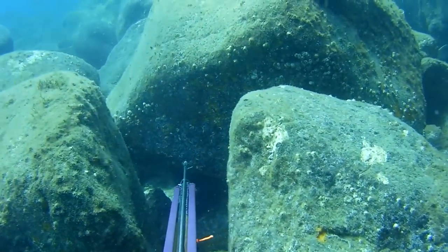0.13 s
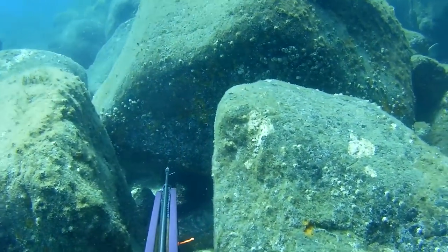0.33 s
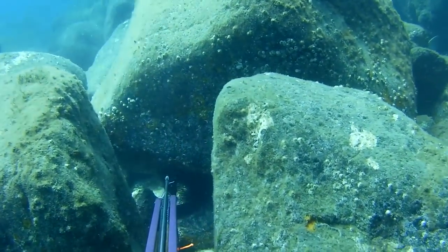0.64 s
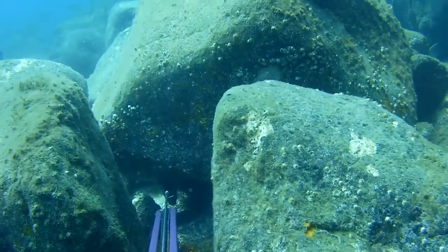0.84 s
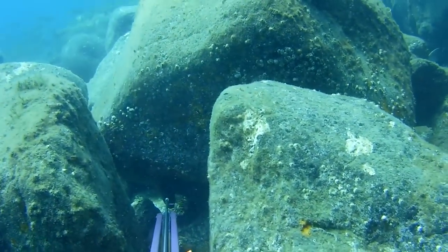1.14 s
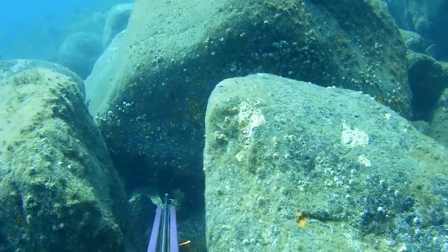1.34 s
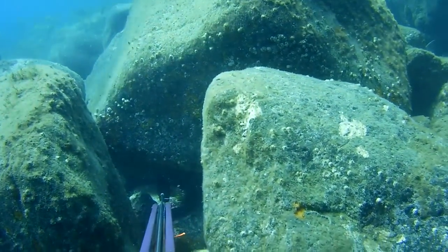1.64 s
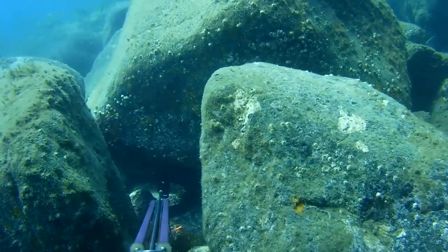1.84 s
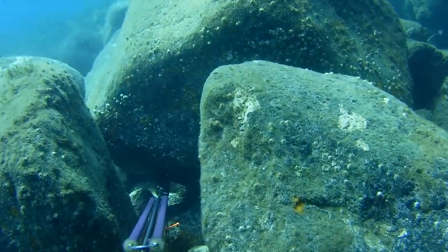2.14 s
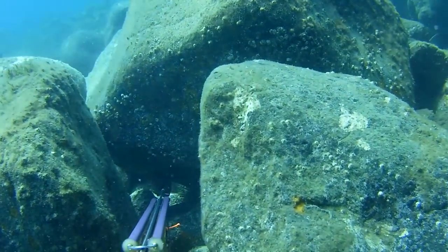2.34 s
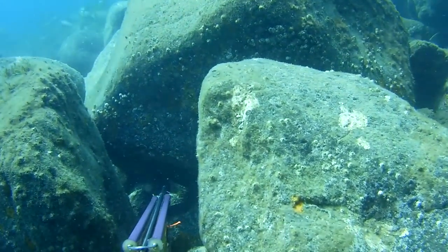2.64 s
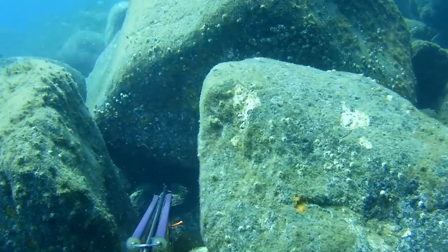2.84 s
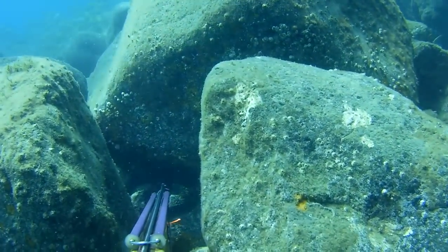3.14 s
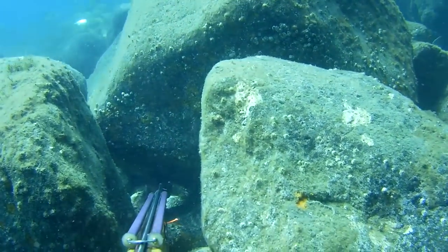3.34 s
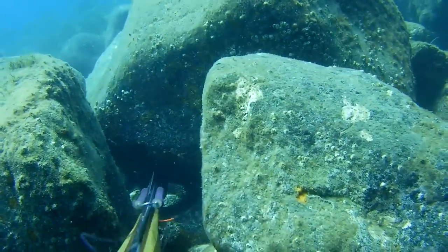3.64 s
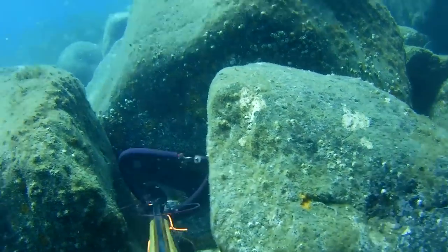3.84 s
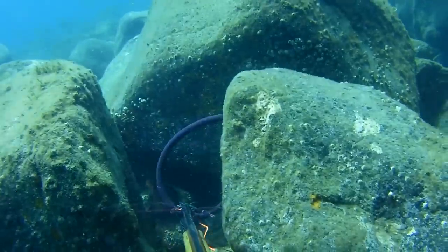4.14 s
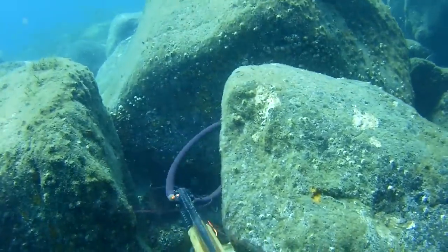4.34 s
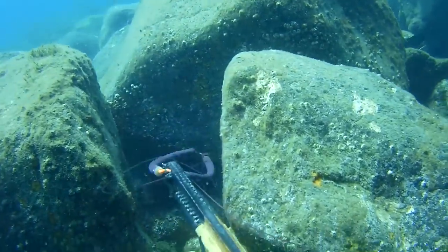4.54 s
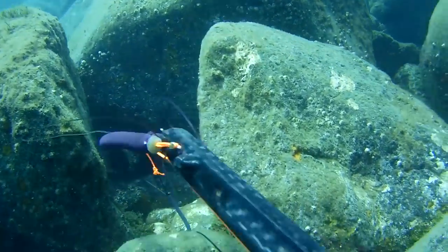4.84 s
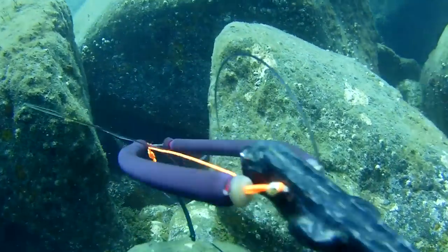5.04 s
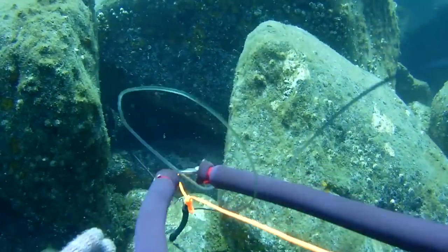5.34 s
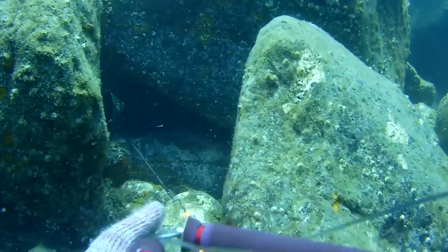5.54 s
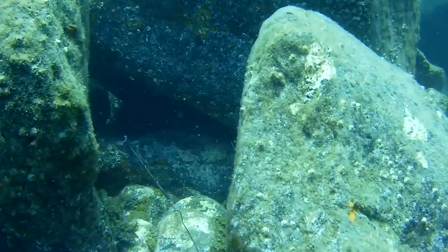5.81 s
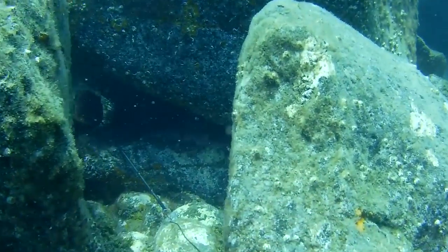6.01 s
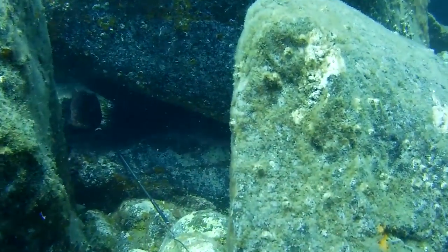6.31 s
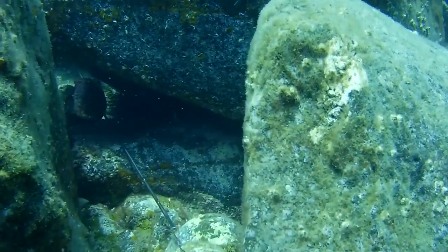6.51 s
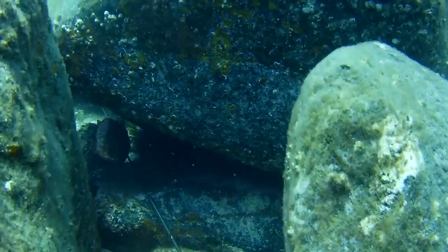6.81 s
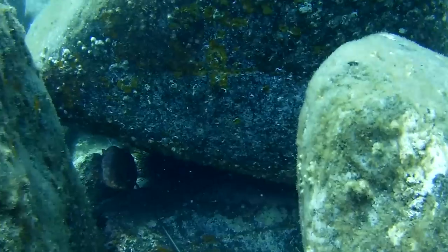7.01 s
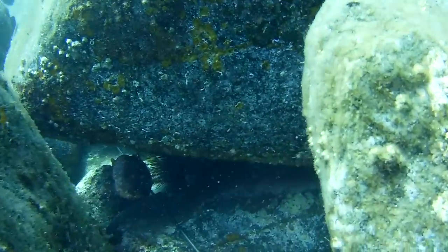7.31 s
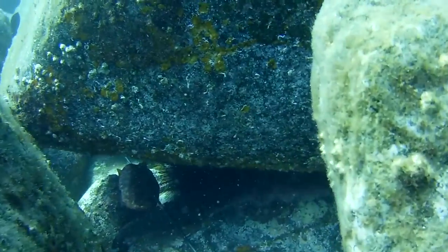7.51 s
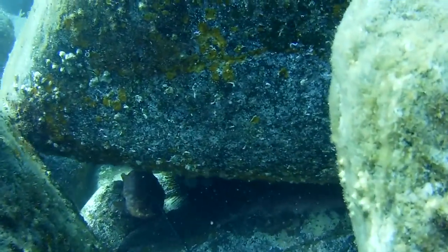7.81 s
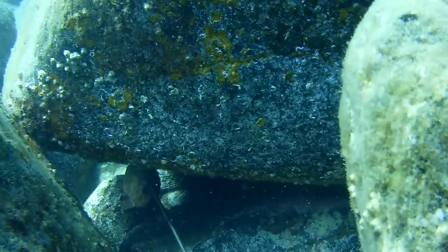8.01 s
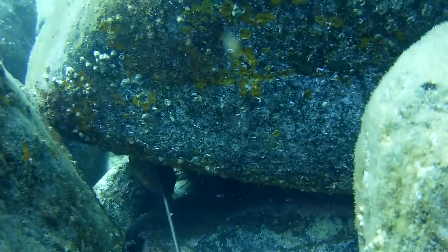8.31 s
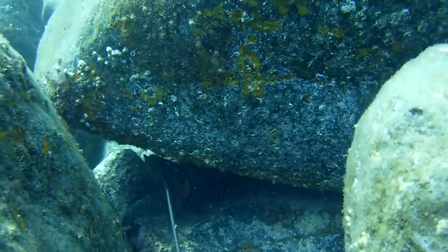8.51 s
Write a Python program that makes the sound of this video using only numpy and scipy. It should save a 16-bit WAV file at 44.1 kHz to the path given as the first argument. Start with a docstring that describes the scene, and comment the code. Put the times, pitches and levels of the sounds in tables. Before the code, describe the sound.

Underwater on a rocky reef, heard in mono from inside a sealed camera housing. Throughout, a flickering low murmur of water lies under a dense, dry crackle of distant shrimp, with irregular nearer snaps, bright and crisp or duller and smeared by the rocks. From 0 to 0.6 s rapid small knocks bump the case, thinning until about 1.1 s. Mostly crackle follows; from 2.15 s come soft, hollow handling knocks. At about 3.7 s the spear gun fires: a very loud clatter of clacks and thuds lasting some 0.2 s, a low shuddering wobble, and a short steel ping at 3.84 s. A deep slosh surges and dies while knocks continue to about 4.5 s. Sparse bumps return, clearest at 5.6 s. The crackle carries on, with strong snaps at 6.4 and 6.7 s, the loudest at 7.87 s, and another at 8.24 s, until the end near 8.6 s.

```python
"""Rocky reef, heard inside a sealed camera housing: water murmurs, with a deep surge after each knock.
Shrimp snaps, far and near, are noise bursts scattered off the rocks that ring the housing.
Gear knocks are short pushes that ring the case. A rubber-powered spear gun goes off with a clatter
of bursts, a shudder of two low resonances and a steel ping of harmonic partials."""
import sys
import numpy as np
from scipy import signal
from scipy.fft import rfft, irfft, next_fast_len
from scipy.io import wavfile
from scipy.ndimage import uniform_filter1d

SR = 44100
rng = np.random.default_rng(int(sys.argv[2]) if len(sys.argv) > 2 else 0)


def transcribe(u):
    """Save the signal u as a 16-bit wav file named by the first command-line argument.

    u: samples, shape (n,) or (channels, n), limited to [-1, 1]; the rate is SR.
    q: integer samples, one column per channel.
    """
    v = np.clip(np.atleast_2d(u).T, -1, 1)
    q = np.round(v * 32767).astype(np.int16)
    wavfile.write(sys.argv[1], SR, q)


N = 381906

# knocks on the case: t/s, louder of thump and ring as peak level/dB,
# hollowness as ring over thump level/dB, hardness as tick over that peak level/dB
CASE_KNOCKS = [(0.047, -24.5, -0.5, -1), (0.102, -26.5, -1.5, -1), (0.144, -25.5, 1, -1.5),
               (0.18, -23, -3.5, -3), (0.23, -22.5, -1, 2), (0.286, -26.5, -8, 2), (0.328, -24.5, -5, 1),
               (0.355, -33.5, 0, 9.5), (0.366, -26, 12, -5), (0.4, -32.5, -1, 0),
               (0.469, -26.5, -2.5, -3.5), (0.516, -37, -5, -6), (0.582, -36.5, -8, -1),
               (0.811, -27.5, -3.5, -5), (0.944, -29, -7, -5), (1.008, -36, -3, -6), (1.124, -30, -10, -4),
               (2.151, -29, 24, -27), (2.299, -26.5, -17, -1.5), (2.678, -37.5, 13, -5),
               (2.744, -29, 26, -23), (2.893, -31.5, -6, -5), (2.941, -38, 9, -14), (2.975, -31, 23, -18),
               (3.125, -27.5, 33, -26), (3.201, -30.5, 6, -19), (3.335, -32, 14, -18),
               (3.547, -28.5, 24, -18), (3.574, -33, -8, -9), (3.627, -30.5, 29, -22), (3.689, -15, 4, -6),
               (3.705, -18, 5, 9), (3.716, -12, 3.5, 8), (3.725, -18.5, 13, 8), (3.738, -13.5, 7, -21),
               (3.749, -15, -17, 6.5), (3.756, -13.5, 20, -10), (3.766, -26, -9, 1), (3.785, -34, 8, -6),
               (3.803, -22.5, 8, -8), (3.812, -9.5, 4, 1), (3.844, -18.5, 21, 0), (3.864, -24.5, 7, 0),
               (3.918, -19.5, -2.5, -12), (3.934, -21.5, -7, 1), (3.995, -24.5, -12, -10),
               (4.006, -33, 0, 2), (4.041, -18.5, 6, 5.5), (4.078, -26, -9, -19), (4.147, -25, 0, 2.5),
               (4.176, -36, 6, 3), (4.214, -27.5, -3, -1), (4.234, -23.5, 15, 1.5), (4.391, -26, 2, -1),
               (4.433, -30.5, -1, -2), (4.547, -29.5, -1, -0.5), (4.727, -30, -2, -1),
               (4.966, -27, -6.5, -14), (5.059, -27.5, 5, 1), (5.136, -40, -5, 8.5), (5.339, -33, -1, -2),
               (5.368, -30.5, -4.5, -2.5), (5.619, -22, -6, 1), (5.634, -20.5, 16, -2.5),
               (5.654, -31, -2, 0), (5.713, -34.5, 1, 3), (5.748, -25.5, -3, -2.5), (6.692, -35.5, 20, -23),
               (6.82, -25.5, -9, -12), (6.848, -34, 4, -1), (6.975, -40, 12, -10), (7.097, -27.5, -12, -15),
               (7.215, -40.5, 12, -13), (7.382, -30, 14, -7), (7.88, -28, 8, 0), (8.079, -34, -10, -17),
               (8.165, -42, 3, -5), (8.195, -38.5, 3, 1)]


def undb(db):
    """Amplitude factor of a level in dB."""
    return 10 ** (np.asarray(db) / 20)


def level(x, db):
    """Scale to an RMS level in dB."""
    return x * undb(db) / np.sqrt(np.mean(x ** 2))


def walk(rate_hz):
    """Random steps, each 1 / rate_hz long, smoothed twice; spread near 1."""
    step = int(SR / rate_hz)
    steps = np.repeat(rng.standard_normal(N // step + 1), step)
    smooth = uniform_filter1d(uniform_filter1d(steps, step), step)
    return 1.39 * smooth[:N]


def bandpass(edges_hz):
    """Third-order Butterworth band."""
    return signal.butter(3, edges_hz, "band", fs=SR, output="sos")


def response(modes, size=2048):
    """Sum of decaying resonances; wider ones die faster, with dB as relative gain at the centre."""
    t = np.arange(size) / SR
    total = np.zeros(size)
    for hz, width_hz, db, sign in modes:
        decay = width_hz * np.exp(-np.pi * width_hz * t)
        total += np.sign(sign) * undb(db) * decay * np.cos(2 * np.pi * hz * t)
    return total


def add(out, s, sound, peak_db):
    """Place a sound at s seconds with the given peak."""
    i = int(s * SR)
    piece = sound[:N - i]
    out[i:i + len(piece)] += piece * undb(peak_db) / np.abs(sound).max()


def housing_parts():
    """Single rings of the housing in four bands: lower body, upper body, low ring, treble."""
    # housing resonances: f/Hz, width/Hz, relative level/dB, polarity
    housing_modes = [(1594, 104, -1, 1), (2275, 1080, -6.5, 1), (2591, 208, 6.5, -1), (3053, 256, 4.5, 1),
                     (3750, 440, -3.5, 1), (4455, 447, 3.5, -1), (5730, 147, -6, -1), (6297, 255, -4, -1),
                     (7110, 460, -9, -1), (9290, 650, -4.5, 1), (11480, 3200, -18.5, -1),
                     (11390, 450, -18, 1), (13350, 1100, -27.5, -1), (15600, 790, -31, 1)]
    # the four bands: low edge f/Hz, high edge f/Hz
    part_edges_hz = [(2000, 3400), (3400, 5250), (1420, 2000), (5250, 19000)]
    parts = []
    for low_hz, high_hz in part_edges_hz:
        band = bandpass([low_hz, high_hz])
        inside = [mode for mode in housing_modes if low_hz < mode[0] < high_hz]
        parts.append(np.array([signal.sosfilt(band, response([mode], size=1024)) for mode in inside]))
    return parts


def knock_parts(rows):
    """Thump, ring and tick peaks: hollow spots ring, firm spots thump, hard blows tick."""
    return [(s, db - max(hollow_db, 0), db + min(hollow_db, 0), db + hard_db)
            for s, db, hollow_db, hard_db in rows]


def surge(calm_db=-60.5, stir_db=-25.5, settle_s=0.29):
    """Slosh level round the case: each thump adds power to a calm floor, which then decays."""
    stir = np.zeros(N)
    for s, thump_db, *_ in knock_parts(CASE_KNOCKS):
        stir[int(s * SR)] = undb(thump_db + stir_db) ** 2
    fade = np.exp(-2 / (settle_s * SR))
    return np.sqrt(undb(calm_db) ** 2 + signal.lfilter([1], [1, -fade], stir))


def water(murmur_db=-52.5):
    """Flickering murmur of shaped noise, and deep band noise that surges after thumps."""
    # murmur spectrum: f/Hz, relative density level/dB
    murmur_spectrum = [(12, -33), (20, -24), (59, -2.5), (301, -4), (576, -8), (665, -8), (1300, -18),
                       (1370, -25), (1500, -5.5), (1950, -66), (3300, -120)]
    shape_hz, shape_db = np.transpose(murmur_spectrum)
    size = next_fast_len(N)
    hz = np.maximum(np.arange(size // 2 + 1) * SR / size, 1)
    shape = undb(np.interp(np.log(hz), np.log(shape_hz), shape_db))
    noise_spectrum = rfft(rng.standard_normal(size))
    murmur = irfft(noise_spectrum * shape, size)[:N]
    murmur = level(murmur, murmur_db) * undb(1.43 * walk(20))
    deep = signal.sosfilt(bandpass([8, 36]), rng.standard_normal(N))
    return murmur + level(deep, 0) * surge() * undb(4.8 * walk(7.9))


def chorus(parts, rate_hz=350, spread_db=3.0, colour_db=4, scatter_s=0.0035, haze_db=-4, flurry_db=5):
    """Far snaps of unequal size and colour, smeared by the rocks, over a haze of farther ones."""
    # distant shrimp, before flicker: t/s, level/dB
    chorus_levels = [(0.0, -38.5), (0.26, -43.5), (0.65, -37.5), (0.91, -42), (1.16, -39), (1.6, -38.5),
                     (1.71, -43.5), (1.8, -38.5), (2.19, -40), (2.36, -35.5), (2.6, -40.5), (3.74, -40),
                     (3.9, -36.5), (4.12, -40), (6.42, -40), (6.85, -39.5), (7.1, -35), (7.28, -40),
                     (7.91, -42.5), (8.08, -40), (8.66, -37.5)]
    chance_per_sample = rate_hz / SR * undb(flurry_db * walk(30))
    when = np.flatnonzero(rng.random(N) < chance_per_sample)
    size_db = np.minimum(spread_db * rng.exponential(size=len(when)), 4 * spread_db)
    noise, out, power = rng.standard_normal(N), np.zeros(N), np.zeros(N)
    fade = np.exp(-2 / (scatter_s * SR))
    for ring in np.vstack(parts):
        # each snap excites each ring by a different amount
        power[when] = undb(size_db + colour_db * rng.standard_normal(len(when))) ** 2
        smeared = signal.lfilter([1], [1, -fade], power)
        push = noise * np.sqrt(smeared / smeared.mean() + undb(haze_db) ** 2)
        out += signal.oaconvolve(push, ring)[:N]
    level_s, level_db = np.transpose(chorus_levels)
    trend_db = np.interp(np.arange(N) / SR, level_s, level_db)
    return level(out, 0) * undb(trend_db + 0.53 * walk(25))


def knocks(contact_ms=0.19, bounce=0.4, wash_db=-16, detune=0.063, tint_db=3.5, faint_db=-45):
    """A short push, ragged rebound and fainter wash ring the case, differently at each spot."""
    # struck case as three lists, thump, ring and tick: f/Hz, width/Hz, relative level/dB, polarity
    case_modes = [
        [(28, 17, -3, 1), (113, 107, 5.5, 1), (174.4, 29, 2.5, 1), (348, 63, -25, 1)],
        [(675, 72, 19.5, 1), (616, 190, -7, 1), (780, 66, -17, 1)],
        [(986, 79, -6, -1), (1222, 77, -2, 1), (1615, 87, 8.5, 1), (1860, 180, 1.5, 1)],
    ]
    # bands of thump, ring and tick: low edge f/Hz, high edge f/Hz
    case_edges_hz = [(15, 500), (420, 950), (800, 2100)]
    out, t = np.zeros(N), np.arange(3072) / SR
    bands = [bandpass(edges_hz) for edges_hz in case_edges_hz]
    # loose straps add faint taps at random moments
    faint = [(s * N / SR, faint_db - 6 * a, faint_db - 6 * b, faint_db)
             for s, a, b in rng.random((40, 3))]
    rebound_fade = np.exp(-t / 0.0047) + undb(wash_db) * np.exp(-t / 0.022)
    for k, (s, *peaks_db) in enumerate(knock_parts(CASE_KNOCKS) + faint):
        contact = np.exp(-((t * 1000 / contact_ms - 2) ** 2))
        # a simple choice: the push flips polarity from one row to the next
        push = (-1) ** k * contact + bounce * rng.standard_normal(len(t)) * rebound_fade
        for modes, band, db in zip(case_modes, bands, peaks_db):
            here = [(hz * (1 + detune * rng.standard_normal()), width_hz,
                     gain_db + tint_db * rng.standard_normal(), sign)
                    for hz, width_hz, gain_db, sign in modes]
            ring = signal.fftconvolve(push, response(here, size=3000))
            add(out, s, signal.sosfilt(band, ring), db)
    return out


def bursts(rows, parts, crack, fall, tail_db, tail_s, grain_db, colour_db, crack_s=3e-5):
    """Sharp crack, ragged echoes dying with the scatter time, faint wash; each burst has its own colour."""
    out, t = np.zeros(N), np.arange(3072) / SR
    for s, *peaks_db, ms in rows:
        echoes = np.exp(-fall * t / (max(ms, .5) / 1000)) + undb(tail_db) * np.exp(-t / tail_s)
        # louder and softer clumps, 40 samples or about a millisecond long
        grains = np.repeat(rng.standard_normal(len(t) // 40 + 1), 40)[:len(t)]
        clumps = undb(grain_db * np.minimum(grains, .7))
        # the shorter the scatter, the more the direct crack stands out
        direct = crack / max(ms, 2) * np.exp(-t / crack_s)
        push = rng.standard_normal(len(t)) * clumps * echoes + direct
        for part, db in zip(parts, peaks_db):
            tint = undb(colour_db * rng.standard_normal(len(part)))
            add(out, s, signal.fftconvolve(push, tint @ part), db)
    return out


def near_snaps(parts, treble_db=3.5, treble_per_bright=0.23, loss_db_per_doubling=2):
    """Bright snaps favour the upper body; the longer the scatter, the duller the treble."""
    # near snaps: t/s, mean of lower and upper body peak level/dB,
    # brightness as upper over lower body level/dB, low ring over body level/dB, scatter/ms
    snaps = [(0.125, -33.5, -6, -16, 37), (0.1714, -24.5, 0, -13, 23), (0.248, -29, 4, -12, 6.7),
             (0.302, -31, 0, -16, 10), (0.3172, -31.5, 5, -16, 8.4), (0.4381, -24.5, 7, -20, 0.87),
             (0.4462, -24.5, 1, -13, 5.1), (0.4946, -25.5, 10, -16, 1), (0.7965, -33.5, 1, -22, 7.5),
             (0.8748, -26.5, 6, -19, 16), (0.8886, -31, -5, -10, 7.9), (1.1102, -29.5, -1, -6, 7.9),
             (1.1675, -26.5, -10.5, -8, 10), (1.2784, -31.5, -10, -11, 8.9), (1.3018, -22.5, -1, -25, 4.3),
             (1.4126, -32.5, -19, 4.5, 2.1), (1.4929, -25.5, -4, -17, 0.98), (1.512, -30.5, -3, -13, 14),
             (1.5352, -22, 8, -16, 2.6), (1.79, -33, 7, -18, 5.5), (1.8901, -32, 4, -8, 4.3),
             (2.0783, -27.5, -3, -9, 6.5), (2.4034, -26, -9, -10.5, 8.9), (2.4188, -32, 7, -22, 6.9),
             (2.471, -28, 8, -23, 3.6), (2.4796, -35, -18, -24, 6.1), (2.7896, -26, -9, -12.5, 10),
             (2.8674, -28, 0, -13, 5.6), (3.144, -29, -5, -12, 8.1), (3.163, -23, -8, -21, 5.4),
             (3.1912, -31, -2, -9, 4.3), (3.3825, -34, 9, -13, 14), (3.3877, -27.5, -5, -9, 7.5),
             (3.5012, -27.5, 4, -15, 0.85), (3.9226, -22.5, -10, -18, 3.5), (4.0603, -33.5, 19, -18, 3),
             (4.1065, -27, -10.5, -9, 5.6), (4.2652, -30.5, 6, -12, 3.8), (4.3402, -32.5, -7, -14, 3.9),
             (4.4034, -27.5, -1, -5, 2.7), (4.4194, -23.5, -7, -11, 9.5), (4.4506, -31, -4, -13, 4.3),
             (4.7556, -30, -10, -8, 9.6), (4.829, -25, -2, -13, 7.4), (4.8387, -30, 6, -11, 5.4),
             (5.0409, -28.5, -4, -8, 9.5), (5.0531, -28, -5, -17, 15), (5.0675, -29.5, -7, -15, 52),
             (5.0851, -31.5, 6, -14, 7.8), (5.1525, -29, -13, -12, 6.3), (5.3145, -26.5, -4, -17, 3.5),
             (5.4537, -30, -7, -5.5, 12), (5.465, -26, 3, -25, 12), (5.4981, -25.5, 7, -14, 3.7),
             (5.5972, -25.5, -1, -13, 24), (5.7424, -28, 1, -10, 2), (5.8349, -32, 22, -11, 3),
             (5.951, -30, 0, -12, 26), (6.0465, -33, 8, -12, 8.4), (6.219, -23, 1, -12.5, 3.9),
             (6.2726, -27, -3, -17, 6.2), (6.2854, -27.5, 3, -8, 5.4), (6.4385, -19, -6, -23, 2.5),
             (6.4941, -34, -2, -17, 6), (6.609, -36, 2, -18, 4.1), (6.6614, -14.5, -3.5, -20, 1.7),
             (6.7851, -29, 6, -25, 1), (7.0253, -27, -9, -25, 4.6), (7.0327, -30, -7, -26, 10.6),
             (7.1732, -26, 0, -11, 3.3), (7.3029, -33.5, 14, -11, 6.4), (7.4632, -31.5, 13, -18, 3.3),
             (7.5542, -26.5, -11, -15, 4.7), (7.8654, -7.5, -12.5, -9, 1.8), (7.9246, -28, 10, -5.5, 2.9),
             (8.0305, -24, -1, -21, 2.2), (8.0875, -26, -1, 4.5, 7.4), (8.2416, -18, 2.5, -20, 2.3),
             (8.3435, -27.5, -4, -15, 11), (8.3695, -27, 19, -9, 2.1), (8.5171, -32, -10, -25, 3.9)]
    rows = []
    for s, db, bright_db, low_db, ms in snaps:
        loss_db = loss_db_per_doubling * np.log2(ms)
        treble_peak_db = db + treble_db + treble_per_bright * bright_db - loss_db
        rows.append((s, db - bright_db / 2, db + bright_db / 2, db + low_db, treble_peak_db, ms))
    return bursts(rows, parts, crack=24.2, fall=0.57, tail_db=-20.5, tail_s=0.033,
                  grain_db=3.5, colour_db=4.0)


def gun_rattle(parts, upper_db=-4, low_db=-5):
    """Trigger, shaft and rubber clatter as bursts through the housing as the gun fires."""
    # rattle: t/s, lower body peak level/dB, treble over lower body level/dB, scatter/ms
    clatter = [(3.681, -30, -12, 11), (3.6928, -6.5, 6, 1.9), (3.6992, -16, -11, 13),
               (3.7105, -12.5, 5, 20), (3.716, -38, -18, 4), (3.7216, -14.5, 10.5, 1.7),
               (3.727, -26, 11, 9.1), (3.7354, -18, -13, 9), (3.7492, -16, -17, 5.9), (3.7609, -28, 1, 18),
               (3.781, -34, -6, 24), (3.8122, -18, -10, 2.7), (3.8159, -17.5, -6, 4.4),
               (3.8456, -18, 0, 13)]
    # in the treble, steel on steel shakes only the rings from 7 to 11.5 kHz
    hard = parts[:3] + [parts[3][2:5]]
    rows = [(s, db, db + upper_db, db + low_db, db + treble_db, ms) for s, db, treble_db, ms in clatter]
    return bursts(rows, hard, crack=10.5, fall=1.3, tail_db=-23, tail_s=0.018,
                  grain_db=4.5, colour_db=-1)


def stock():
    """The gun stock's low, slowly dying wobble, which comes through the diver's arm."""
    # stock resonances, before low-pass: f/Hz, width/Hz, relative level/dB, polarity
    stock_modes = [(99.1, 7.4, 10, 1), (65.4, 6.8, 9, 1)]
    # jolts: t/s, peak level/dB
    stock_jolts = [(3.7, -22), (3.741, -21), (3.815, -22.5)]
    out = np.zeros(N)
    wobble = signal.lfilter([1], [1, -.97], response(stock_modes, size=8192))
    for s, db in stock_jolts:
        add(out, s, wobble, db)
    return out


def steel(lowest_hz=1839, rise_s=0.0028):
    """The shaft rings lengthwise, so its thin partials are whole multiples of one tone."""
    # shaft partials: multiple of the lowest tone, relative level/dB, 60 dB decay time/s
    shaft_partials = [(1, -32, 0.089), (2, -16, 0.04), (3, -21.5, 0.08), (4, -15.5, 0.067), (5, -5, 0.08),
                      (6, -27, 0.067), (7, -35, .1)]
    # blows on the shaft: t/s, peak level/dB
    shaft_hits = [(3.822, -35), (3.8442, -7.5)]
    out, t = np.zeros(N), np.arange(SR // 4) / SR
    ping = np.zeros(len(t))
    for multiple, db, t60_s in shaft_partials:
        tone = np.sin(2 * np.pi * multiple * lowest_hz * t)
        ping += undb(db) * tone * np.exp(-np.log(1000) * t / t60_s)
    ping *= 1 - np.exp(-t / rise_s)
    for s, db in shaft_hits:
        add(out, s, ping, db)
    return out


def scene():
    """Sum of all layers, as one channel."""
    parts = housing_parts()
    background = water() + chorus(parts)
    gun = gun_rattle(parts) + stock() + steel()
    return (background + knocks() + near_snaps(parts) + gun)[None]


def record(dry, ceiling=.55, top_hz=15800):
    """The loudest peaks flatten softly, then a steep low-pass cuts the top."""
    flattened = ceiling * np.tanh(dry / ceiling)
    return signal.sosfilt(signal.ellip(8, .2, 70, top_hz, fs=SR, output="sos"), flattened)


dry = scene()
out = record(dry)
transcribe(out)
```